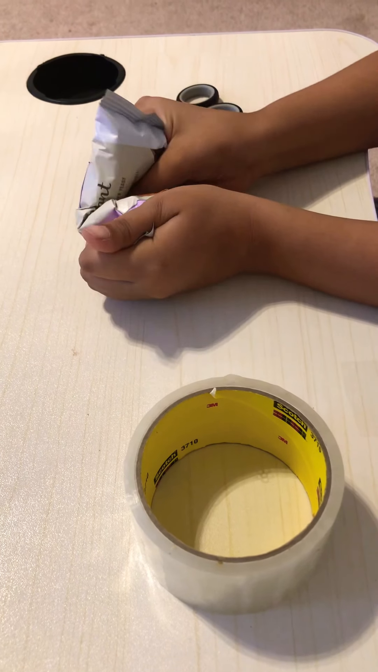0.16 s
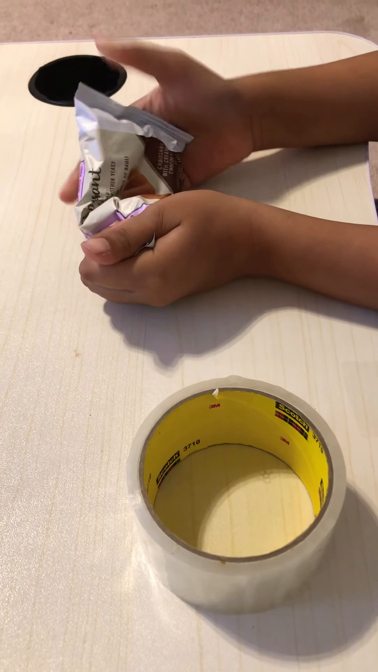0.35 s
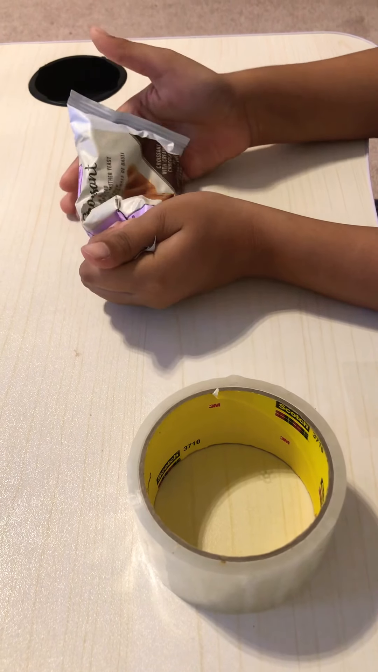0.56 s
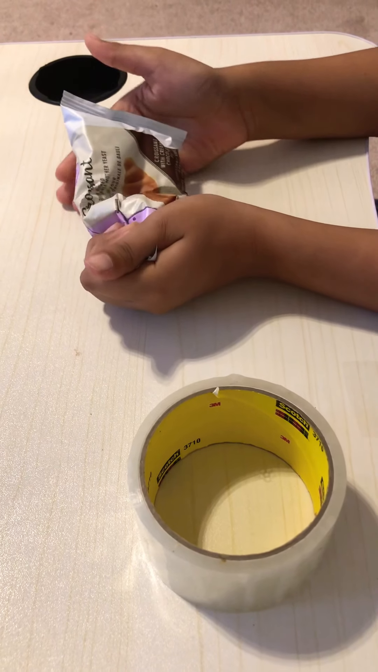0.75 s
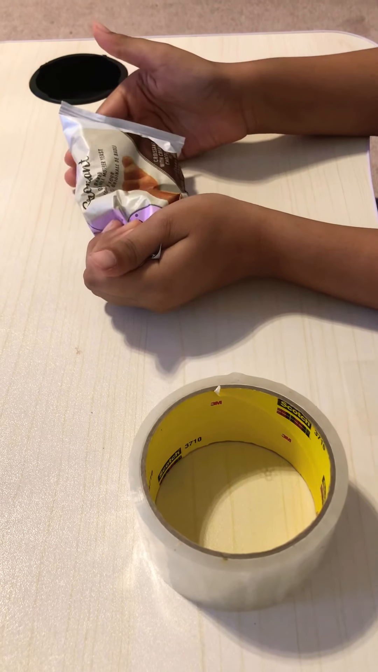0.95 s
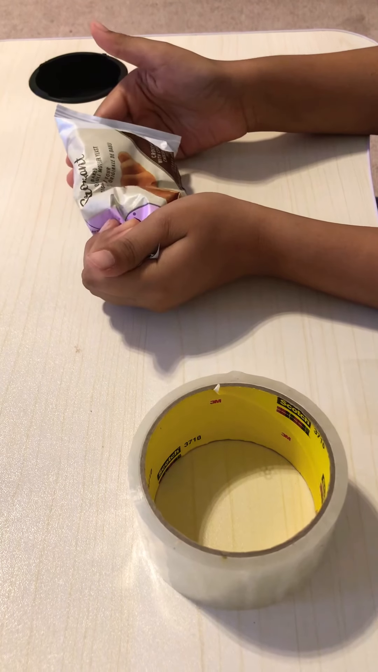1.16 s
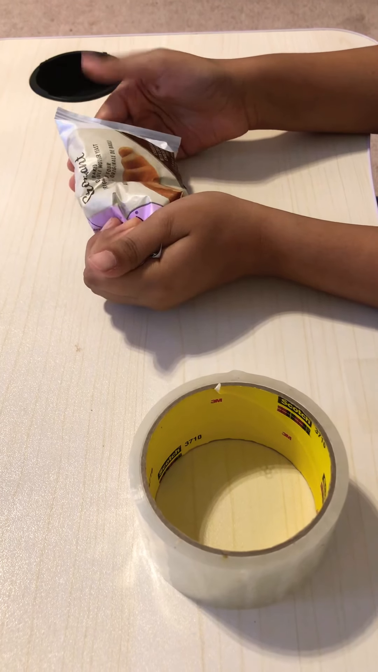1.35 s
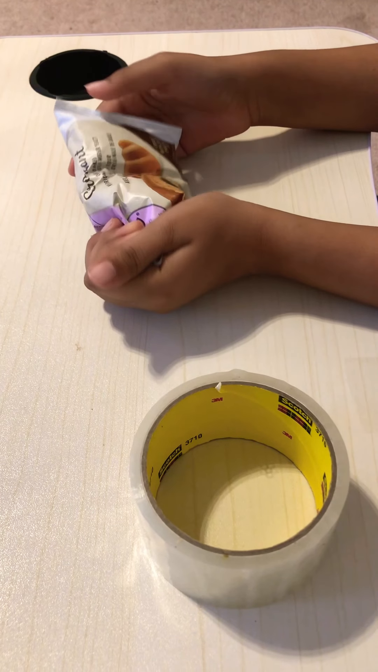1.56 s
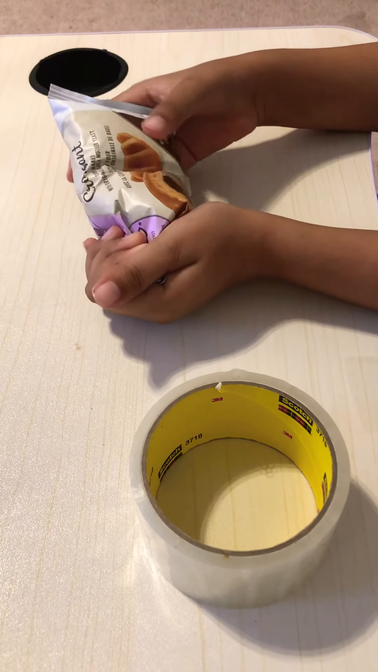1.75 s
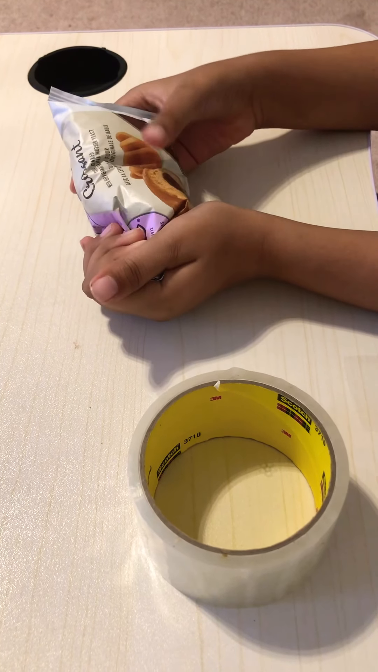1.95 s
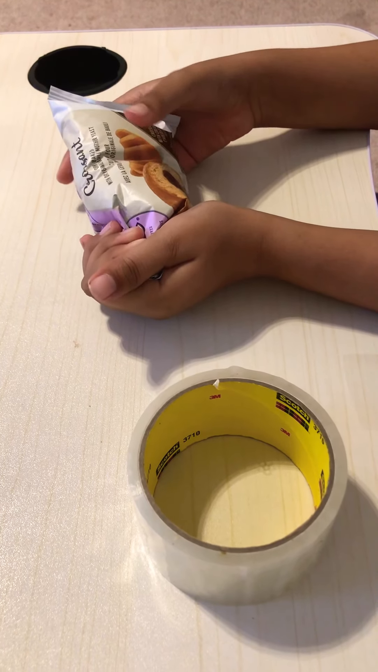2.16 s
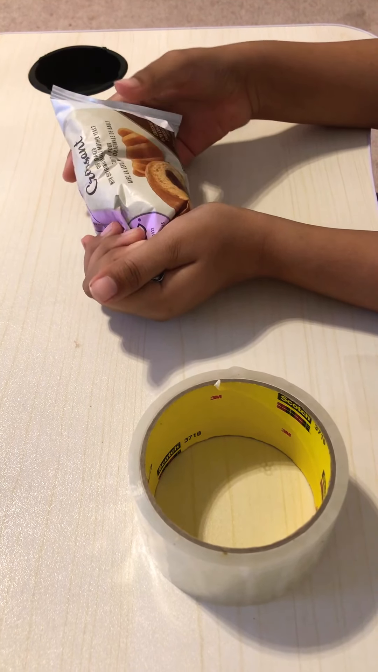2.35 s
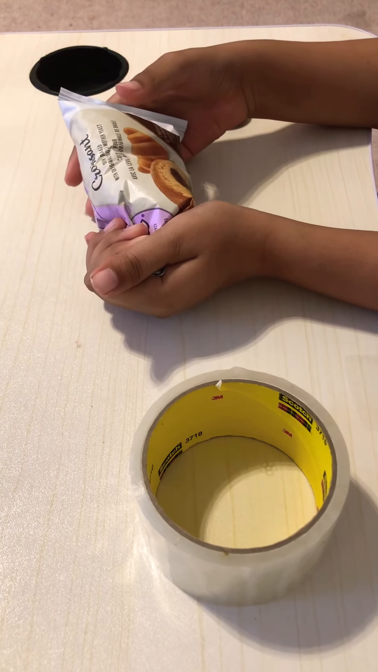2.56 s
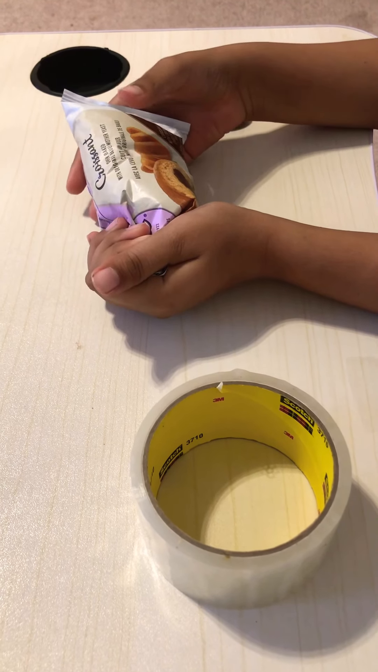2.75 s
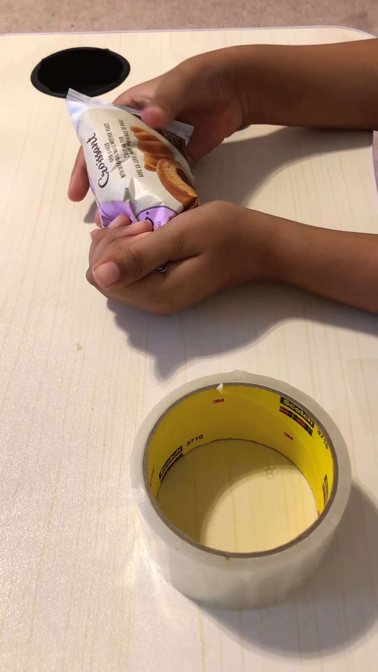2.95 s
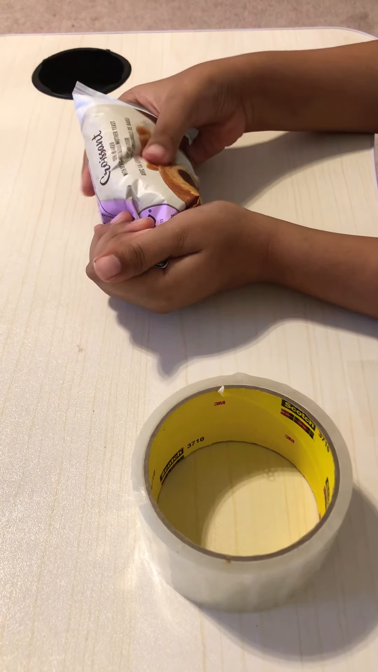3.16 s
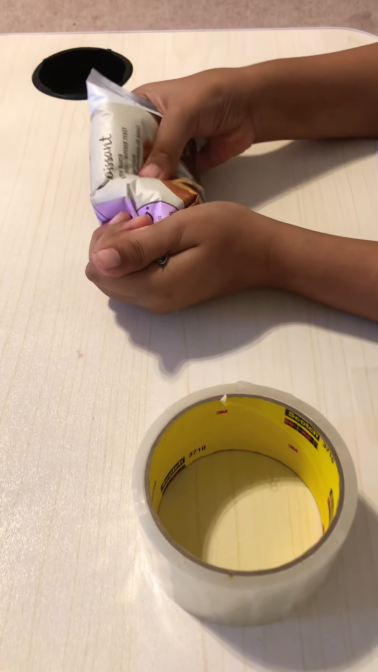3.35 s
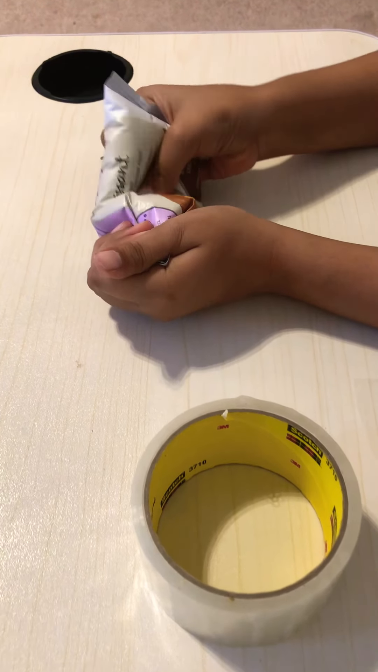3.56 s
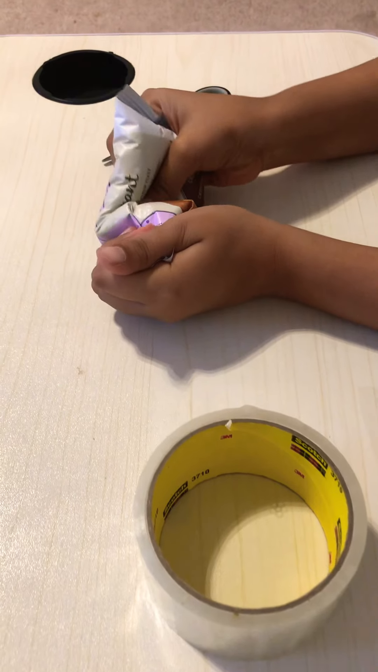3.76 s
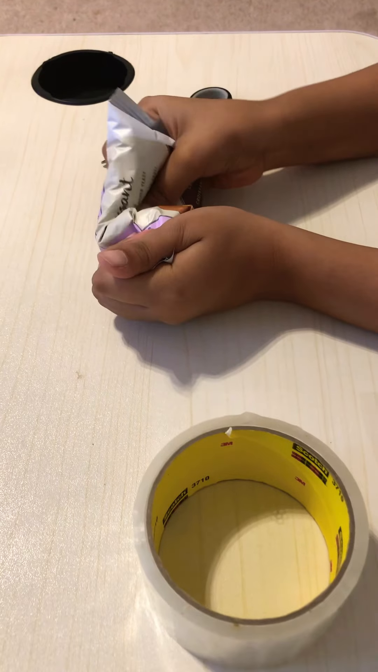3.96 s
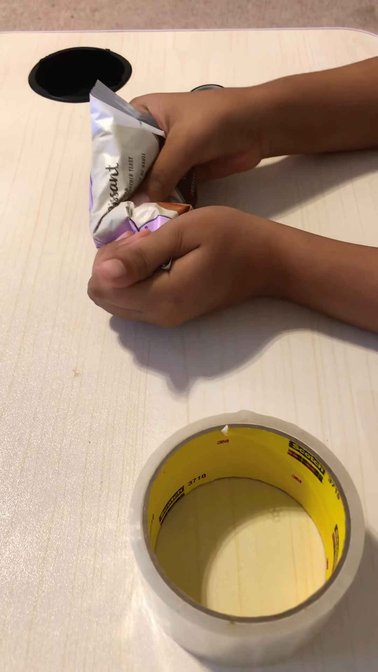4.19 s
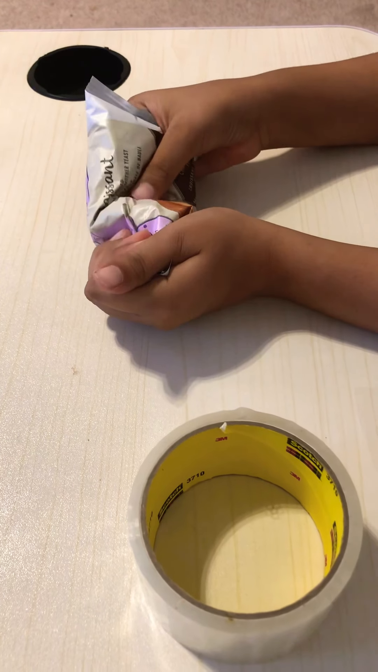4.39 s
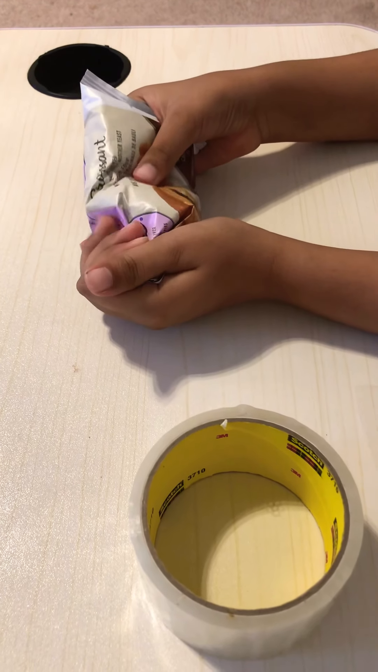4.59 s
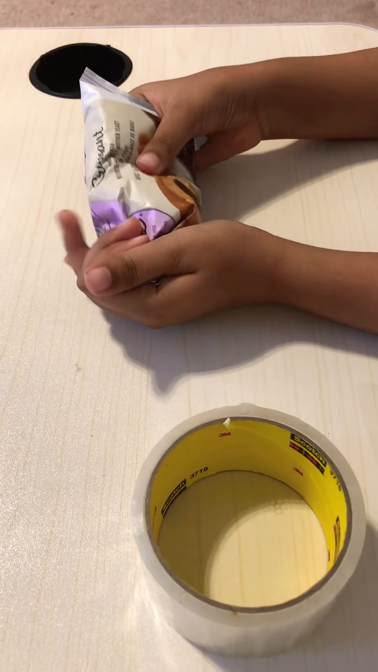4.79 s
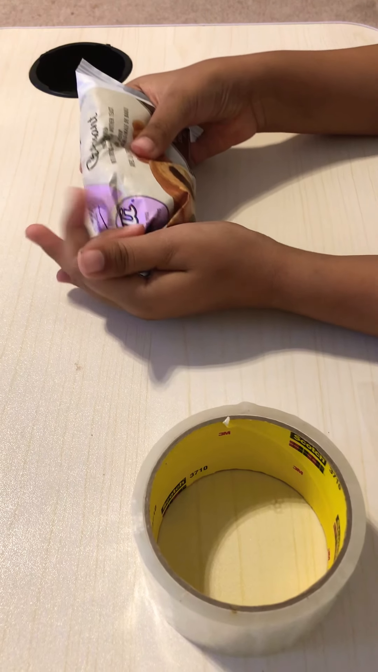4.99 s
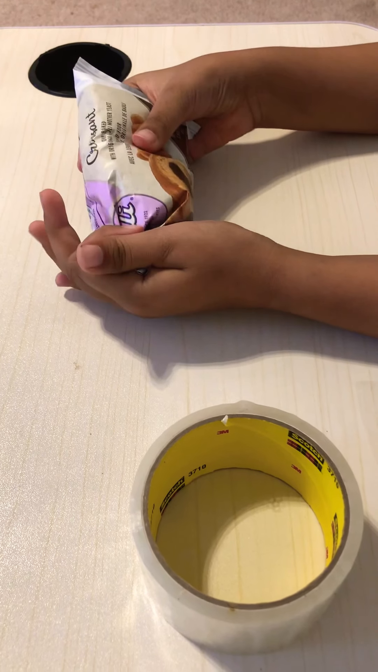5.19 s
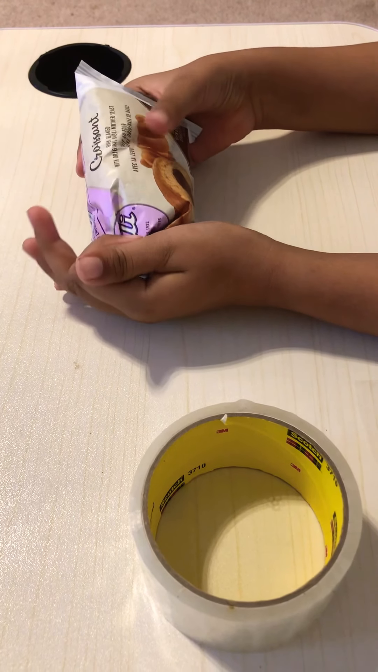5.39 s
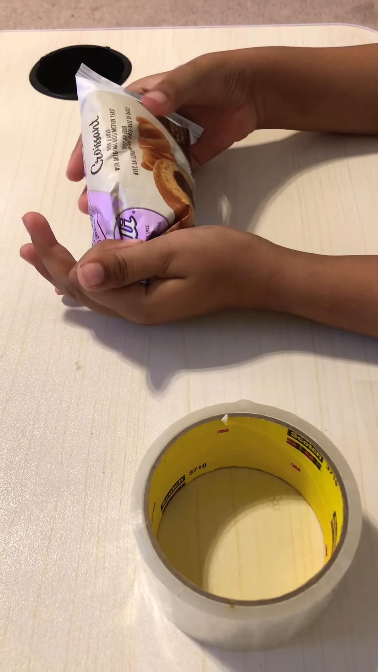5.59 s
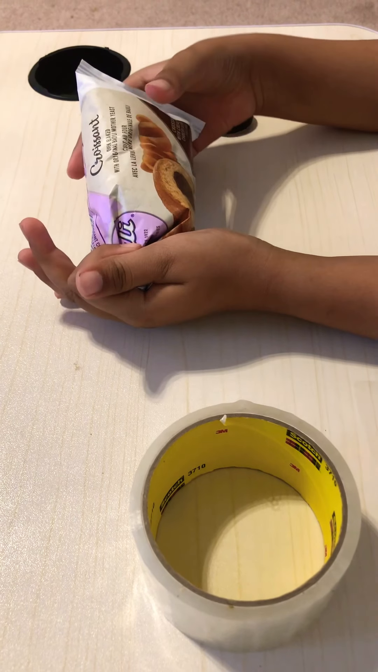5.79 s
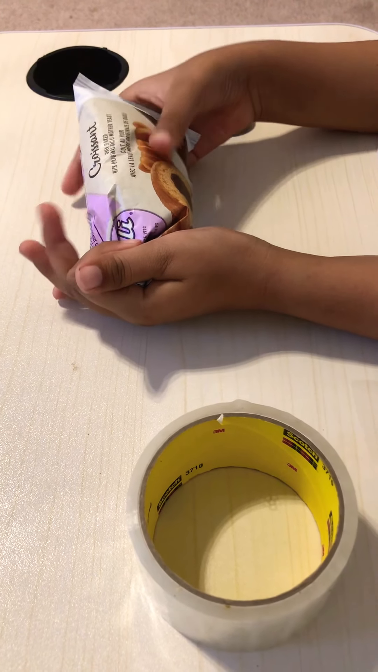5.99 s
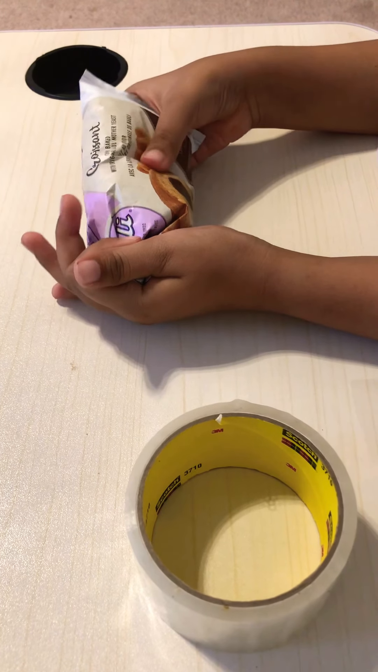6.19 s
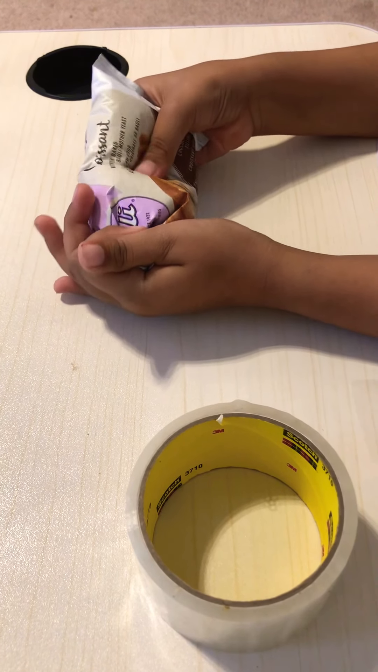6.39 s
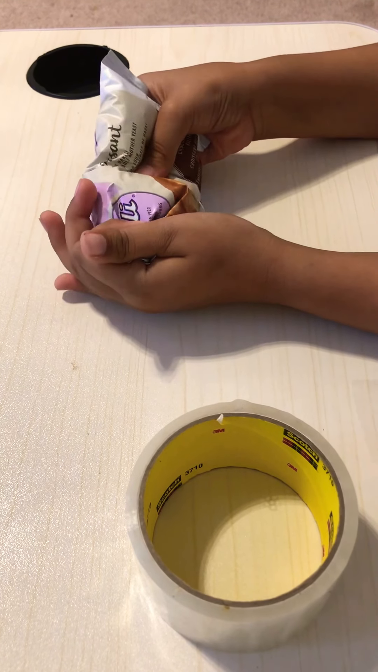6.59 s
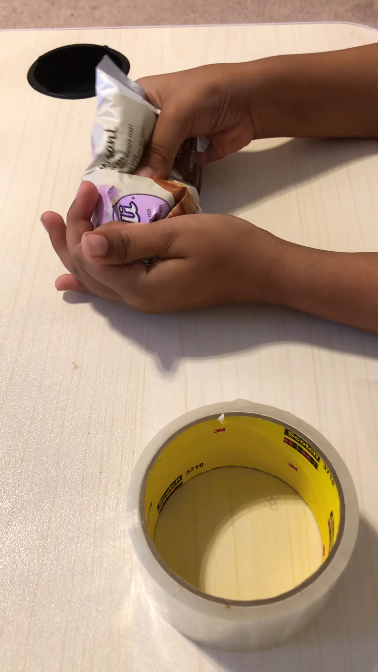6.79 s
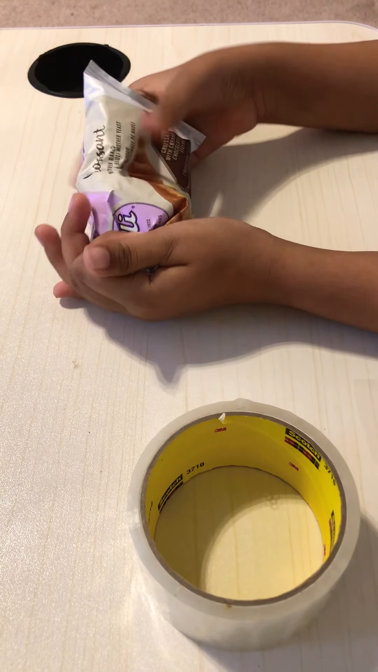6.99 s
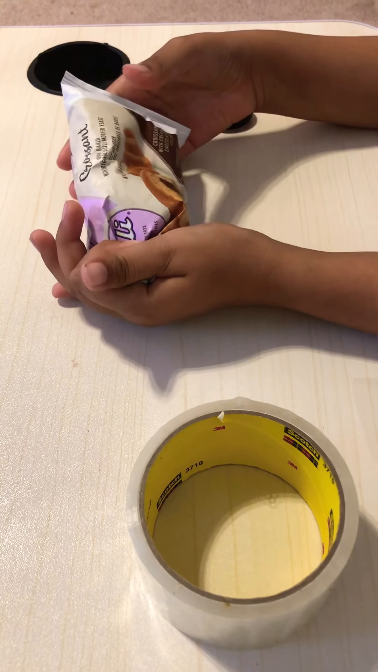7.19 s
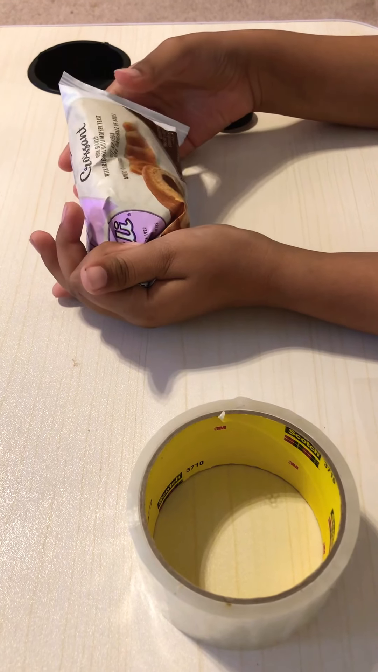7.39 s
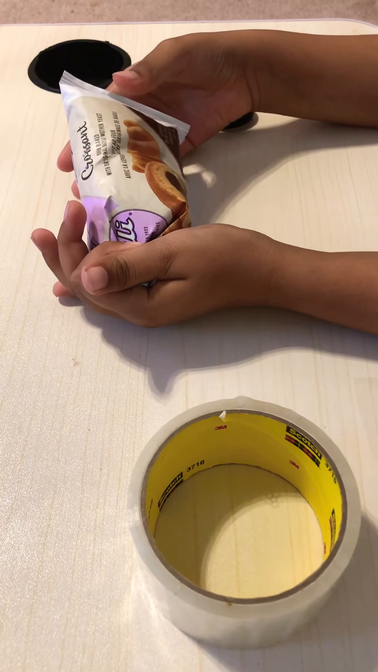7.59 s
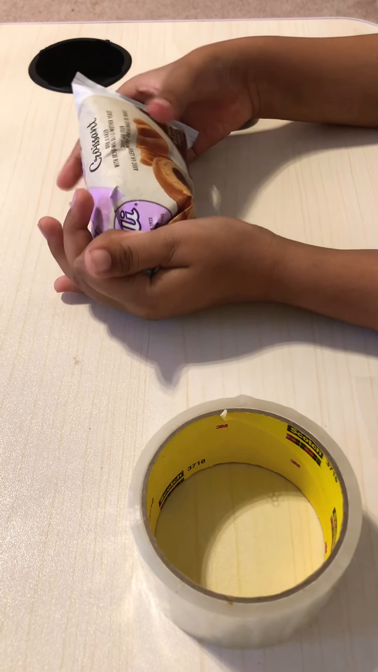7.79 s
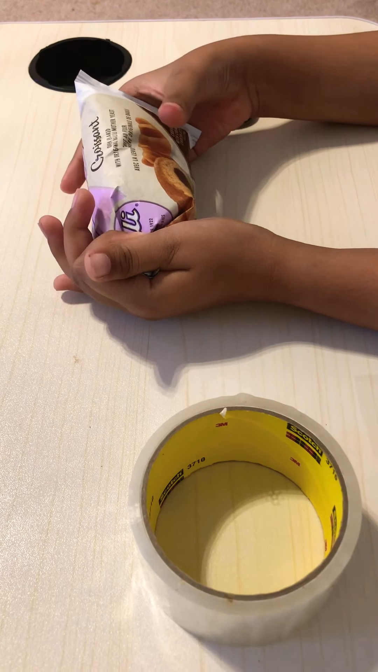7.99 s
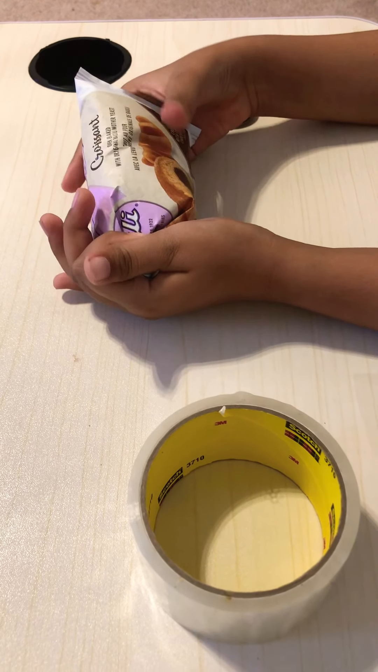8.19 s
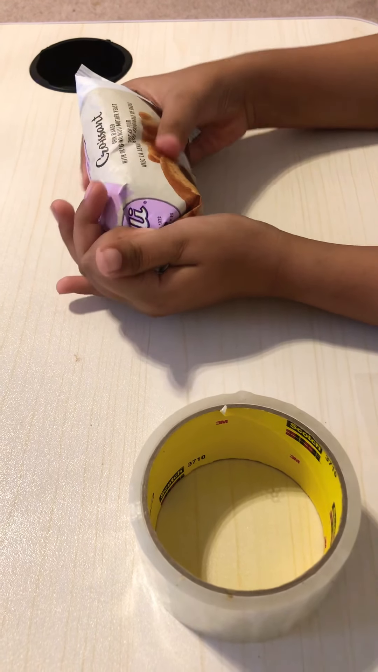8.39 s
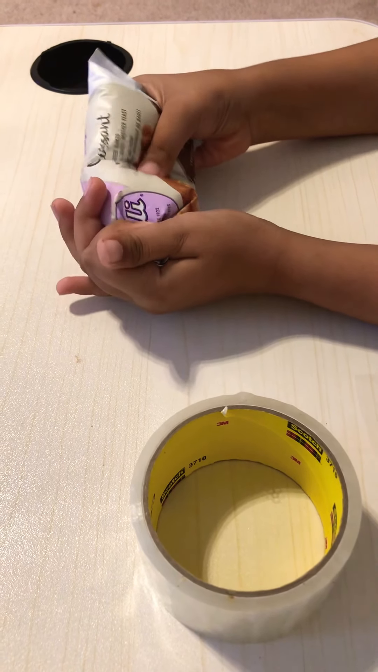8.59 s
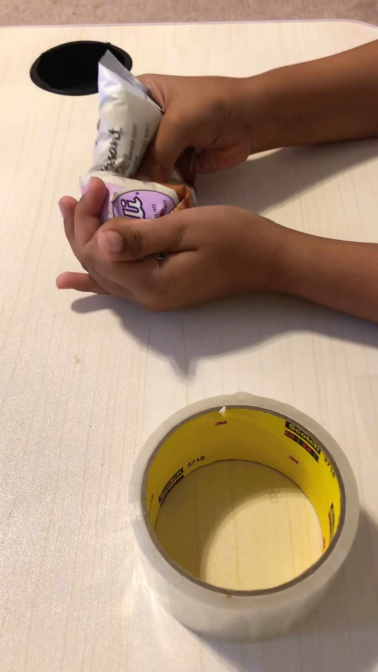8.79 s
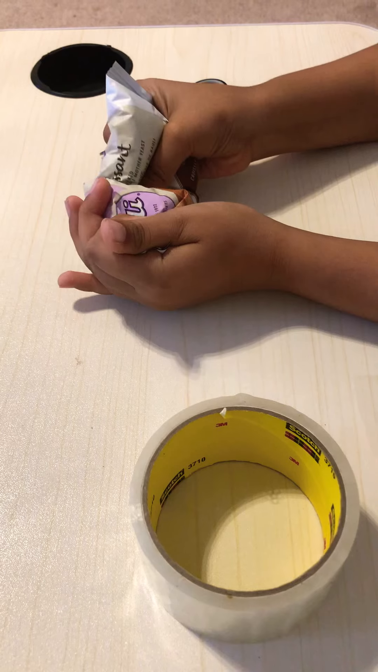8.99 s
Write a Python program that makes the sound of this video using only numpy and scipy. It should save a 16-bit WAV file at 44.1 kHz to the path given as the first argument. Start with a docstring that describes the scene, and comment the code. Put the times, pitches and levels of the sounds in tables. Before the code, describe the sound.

A stuffed plastic snack bag crinkles and snaps in irregular bursts as hands squeeze it on a table, with a brief squeak near the end.

```python
"""Two hands squeeze and release a stuffed plastic snack bag on a table in a small room.
From the start creases in the film snap: a bright crack, then the slower bending wave of the panel.
Countless tiny creases rustle between, over a faint room tone; early on the table rumbles twice, dully.
Squeezes near 3.4, 6.3 and 8.6 s push air out with a hiss, coloured noise that weakens as it flows.
The last one also makes the bag squeak, a wavering tone of three harmonics; the snaps go on to the end."""
import sys
import numpy as np
from scipy import signal
from scipy.fft import rfft, irfft
from scipy.io import wavfile

SR = 44100
rng = np.random.default_rng(int(sys.argv[2]) if len(sys.argv) > 2 else 0)


def waveform_to_disk(signal):
    """Save audio, clipped to [-1, 1], as 16-bit WAV at the path in sys.argv[1]."""
    frames = np.transpose(np.atleast_2d(signal))
    scaled = np.clip(frames, -1, 1) * 32767
    samples = np.round(scaled).astype(np.int16)
    wavfile.write(sys.argv[1], SR, samples)


N = 399105

# Background of the room. Each row: frequency in Hz, relative level in dB.
ROOM_TONE_COLOUR = [(30, -37.5), (41, -8), (80, -3), (125, -9), (175, -0.5), (280, -10), (400, -8.5),
                    (900, -16.5), (1400, -20.5), (8000, -25), (16000, -35)]
ROOM_TONE_DB = -68
# Reverberation. Each row: band centre in Hz, 60 dB decay time in seconds, level in dB.
REVERB_BANDS = [(200, 0.26, -0.5), (500, 0.14, -16), (1270, 0.26, -8.5), (2960, 0.18, -10.5),
                (7000, 0.12, -13.5), (13000, 0.12, -11)]
# Dull rumbles as the arms shift on the table. Each row: start in seconds, length in seconds, level in dB.
RUMBLES = [(0.22, 0.15, -61), (0.6, 0.15, -69)]
# Colour of the rumble. Each row: frequency in Hz, relative level in dB.
RUMBLE_COLOUR = [(20, -5.5), (42, -4), (65, -4.5), (130, -22), (500, -70)]
# Soft bumps of fingers and stuffing. Each row: start in seconds, pitch in Hz, energy in dB.
BUMPS = [(2.0122, 452, -12), (5.188, 233, -29.5), (5.311, 275, -23), (5.554, 230, -32.5), (5.993, 386, -29),
         (7.392, 284, -24)]
# Squeezes hard enough to press air out. Each row: time of full flow in seconds, length in seconds,
# level in dB.
SQUEEZES = [(3.405, 0.34, -34), (6.303, 0.18, -56), (8.59, 0.17, -41.5)]
AIR_RISE_DB_PER_S, AIR_SAG_DB_PER_S, AIR_FALL_DB_PER_S = 155.5, 28, 170
# Colour of the escaping air. Each row: frequency in Hz, relative level in dB.
AIR_COLOUR = [(300, -16), (1300, -21.5), (2200, -8), (3300, 2), (4800, -4.5), (7200, 1), (9600, -4.5),
              (16000, -6)]
# Path of the squeak. Each row: time in seconds, pitch in Hz, level in dB before the harmonics' own levels.
SQUEAK_PATH = [(8.549, 744, -45), (8.571, 747, -41.5), (8.581, 718, -18.5), (8.592, 708, -21),
               (8.602, 747, -20.5), (8.611, 783, -23.5), (8.618, 930, -36), (8.638, 1075, -41)]
# Harmonics of the squeak. Each row: multiple of the pitch, level in dB.
SQUEAK_HARMONICS = [(1, -2.5), (2, -11.5), (3, -20)]
# Strokes of the hands, each pressing the bag or letting it swell. Each row: start in seconds,
# length in seconds, crack level in dB, panel level in dB (both before the trims in the rustle).
STROKES = [(0.0, 0.026, -55.5, -75), (0.23, 0.071, -46, -41), (0.378, 0.049, -51, -52.5),
           (0.568, 0.32, -61, -66), (0.98, 0.092, -62.5, -68), (1.225, 0.095, -65.5, -64),
           (1.445, 0.46, -68, -65.5), (2.428, 0.015, -57, -72), (2.69, 0.029, -65.5, -72),
           (3.023, 0.16, -51, -48.5), (3.224, 0.088, -44.5, -68), (3.486, 0.36, -56, -63),
           (3.956, 0.22, -62.5, -61.5), (4.173, 0.31, -58, -64.5), (4.559, 0.17, -56.5, -53),
           (4.823, 0.14, -54, -56), (5.33, 0.12, -54.5, -55), (5.7, 0.34, -67, -71),
           (6.085, 0.22, -48.5, -49.5), (6.265, 0.32, -48, -53.5), (6.817, 0.06, -49, -49.5),
           (6.92, 0.1, -46, -47), (7.12, 0.047, -61, -60), (7.29, 0.07, -55.5, -53),
           (7.478, 0.026, -55.5, -52), (7.605, 0.3, -69.5, -66.5), (8.225, 0.28, -62, -62.5),
           (8.45, 0.09, -42.5, -42.5), (8.57, 0.13, -42.5, -69), (8.732, 0.12, -48, -64),
           (8.946, 0.069, -61.5, -75)]
STROKE_RISE_DB_PER_S, STROKE_FALL_DB_PER_S = 330, 169.5
HOLD_CRACK_DB, HOLD_PANEL_DB = -77, -70.5  # faint crinkle of the bag merely held, before the same trims
# Larger creases that snap. Each row: start in seconds, crack energy in dB, crack centre in Hz,
# panel energy in dB.
SNAPS = [(0.056, -24, 3000, -33), (0.076, -31, 2700, -30), (0.1055, -15, 4200, -28),
         (0.118, -6.5, 4140, -20), (0.1437, -10.5, 4000, -24), (0.1621, -10.5, 5660, -21),
         (0.19, -14.5, 4070, -17.5), (0.2341, -12.5, 3760, -14), (0.259, -33, 3400, -8.5),
         (0.2661, -14.5, 5170, -7.5), (0.285, -19, 4260, -16.5), (0.2902, -13, 6240, -15),
         (0.305, -21, 3200, -13), (0.3288, -28, 3800, -18), (0.3817, -16.5, 4300, -18),
         (0.3876, -21, 3500, -23), (0.4321, -19.5, 7700, -25), (0.473, -31, 3200, -25.5),
         (0.504, -22, 2540, -42), (0.5374, -20, 6030, -29), (0.5696, -42, 2700, -21.5),
         (0.6323, -15, 4760, -36), (0.649, -13.5, 10200, -21), (0.688, -22, 4480, -19.5),
         (0.719, -31, 6040, -37), (0.7565, -45, 3020, -25.5), (0.8714, -27.5, 5700, -28),
         (0.9934, -22, 4850, -20.5), (1.0203, -30, 3100, -24), (1.048, -14, 3960, -30),
         (1.0762, -25, 3180, -28), (1.0908, -16, 5740, -29), (1.125, -12, 5540, -21.5),
         (1.1682, -18, 5500, -26), (1.2106, -14, 5100, -28.5), (1.273, -27, 3970, -36),
         (1.3535, -32, 5260, -46), (1.4176, -29, 6800, -52), (1.444, -21.5, 3100, -16.5),
         (1.4966, -24, 3400, -19.5), (1.6914, -24, 5570, -24.5), (1.7047, -45, 2840, -27),
         (1.721, -41, 2200, -21), (1.7355, -15.5, 4230, -23), (1.8055, -38, 2600, -24.5),
         (1.8873, -26, 5500, -55), (1.9797, -29.5, 2460, -25), (2.01, -16, 5600, -22.5),
         (2.1384, -41, 3200, -37.5), (2.2508, -26.5, 3350, -19), (2.282, -32, 2530, -23.5),
         (2.334, -31, 2100, -16.5), (2.407, -29.5, 2500, -24), (2.4372, -16.5, 8400, -18.5),
         (2.5667, -46, 2700, -29), (2.6632, -14, 5100, -18.5), (2.7089, -20.5, 2750, -17.5),
         (2.9694, -27, 2190, -27.5), (3.0233, -9.5, 7350, -13), (3.0518, -25, 5400, -12.5),
         (3.066, -20, 3800, -15), (3.0934, -27, 5300, -28), (3.123, -21, 4000, -14),
         (3.1316, -8, 8200, -11), (3.1565, -16.5, 5930, -18), (3.2012, -8.5, 8800, -24),
         (3.2183, -22, 4200, -29), (3.2768, -2.5, 5100, -10), (3.3072, -12, 5000, -37),
         (3.3336, -7.5, 3700, -14), (3.346, -2, 8900, -13), (3.3533, 6.5, 7000, -22),
         (3.4085, -6, 4200, -27), (3.4783, -11.5, 5420, -19.5), (3.5986, -7.5, 9400, -23.5),
         (3.6722, -11, 8300, -23.5), (3.8543, -22, 4100, -23.5), (3.902, -18, 3980, -35),
         (3.958, -23, 2360, -23), (3.9713, -23, 6200, -35), (4.0274, -21, 3450, -24.5),
         (4.0776, -8.5, 4130, -20.5), (4.107, -29, 2880, -21), (4.1234, -19, 5500, -24),
         (4.1567, -20, 4700, -25), (4.173, -19, 3620, -27), (4.1907, -19, 3000, -17),
         (4.1994, -17, 6100, -11.5), (4.2138, -19.5, 6240, -33), (4.291, -24.5, 5500, -29),
         (4.338, -24.5, 3500, -29), (4.3732, -32, 3800, -26.5), (4.4145, -25.5, 4870, -53),
         (4.4948, -20, 6500, -22.5), (4.5415, -23, 6540, -29), (4.6043, -36, 3500, -22.5),
         (4.6425, -23, 4470, -43), (4.6663, -25.5, 5100, -39), (4.6935, -23, 4500, -23),
         (4.768, -29, 3600, -20.5), (4.7896, -32, 3600, -22), (4.8201, -22.5, 6530, -16),
         (4.841, -19.5, 4300, -18), (4.8584, -19, 3500, -14.5), (4.9368, -24, 3300, -32),
         (4.957, -13.5, 2850, -7.5), (4.9823, -15.5, 5370, -19), (5.008, -26, 5430, -21),
         (5.067, -22.5, 3460, -22), (5.2025, -15, 6100, -27.5), (5.2215, -14.5, 2680, -30),
         (5.2784, -23.5, 3100, -15), (5.307, -24, 2300, -22.5), (5.3112, -19.5, 5600, -30),
         (5.355, -28, 3180, -22), (5.392, -22, 3600, -20), (5.4053, -24, 3700, -26),
         (5.4264, -13.5, 14000, -3.5), (5.4724, -24, 3070, -24), (5.482, -24, 3040, -18.5),
         (5.6319, -23.5, 6900, -21), (5.7154, -19.5, 5000, -30), (5.795, -22.5, 4300, -41),
         (5.8451, -19, 3700, -24.5), (5.897, -19, 2670, -28), (5.916, -22, 4400, -30),
         (5.964, -25.5, 4370, -29), (6.06, -16.5, 5760, -20), (6.0805, -19, 3950, -34),
         (6.116, -36, 2250, -15.5), (6.126, -16, 3800, -21), (6.1305, -22, 4000, -14),
         (6.1655, 2, 5040, -2.5), (6.2225, -11.5, 4500, -30), (6.2325, -16, 3700, -11),
         (6.2914, -18, 10100, -34), (6.2965, -8.5, 10100, -32), (6.3516, -13, 7000, -24),
         (6.4293, -17, 6100, -33), (6.464, -8, 5560, -18), (6.481, -8.5, 4170, -16),
         (6.5247, -17, 14200, -45), (6.5387, -10.5, 2860, -24), (6.5679, -10.5, 8800, -18.5),
         (6.6045, -13.5, 6300, -35), (6.6416, -18.5, 4340, -30), (6.7908, -18, 5100, -29),
         (6.7973, -19.5, 3130, -13.5), (6.85, -16, 6000, -14.5), (6.8733, -18.5, 5500, -27),
         (6.9016, -19, 5200, -40), (6.9065, -15, 6500, -11), (6.9327, -10.5, 8950, -17),
         (6.9408, -14, 7000, -8), (6.974, -16, 5330, -38), (6.9876, -17, 4900, -19), (7, -15, 5900, -23),
         (7.0572, -28, 2900, -19), (7.078, -16.5, 4500, -22), (7.1514, -45, 3200, -20.5),
         (7.1597, -21, 2880, -18), (7.1667, -24, 5900, -36), (7.239, -18.5, 2430, -18),
         (7.2859, -6, 5140, -15.5), (7.305, -15.5, 3620, -32), (7.3375, -22.5, 3400, -18),
         (7.3657, -39, 3100, -23), (7.3928, -22, 2680, -35), (7.4638, -25, 5400, -18),
         (7.4783, -14.5, 3800, -16), (7.5338, -28, 4100, -25), (7.5965, -23.5, 4020, -19.5),
         (7.6413, -18.5, 7100, -21), (7.6818, -20, 6030, -29), (7.7325, -18.5, 3400, -22),
         (7.877, -23.5, 4130, -31.5), (8.0299, -23, 3800, -25), (8.18, -17.5, 3420, -23),
         (8.2106, -25, 5040, -36), (8.262, -44, 3000, -29), (8.332, -20.5, 4400, -20),
         (8.4093, -15.5, 5360, -8.5), (8.4273, -24, 2200, -13), (8.4358, -38, 4100, -14.5),
         (8.4497, -9, 6000, -18), (8.4723, -9.5, 6850, -33), (8.5161, -26, 5600, -11.5),
         (8.5402, -2.5, 10400, -14), (8.58, -10.5, 5000, -30), (8.6045, -13, 3300, -34),
         (8.6737, -11, 5100, -42), (8.7299, -11, 5860, -35), (8.761, -12.5, 10400, -45),
         (8.8071, -13.5, 4170, -21), (8.8242, -10.5, 4200, -36), (8.8631, -19, 4940, -28.5),
         (8.9518, -10.5, 4360, -21)]
# Colour of a crack around its centre. Each row: frequency as a multiple of the centre, relative level in dB.
CRACK_COLOUR = [(.15, 0), (.4, -2), (.85, 1.5), (1.25, -2), (2, -10.5), (3.5, -20.5), (6, -38)]
# Ring of a film panel on its stuffing. Each row: frequency in Hz, relative level in dB.
PANEL_COLOUR = [(60, -32.5), (200, -18.5), (400, -5.5), (600, -4.5), (800, 0.5), (1020, 4), (1170, -9),
                (1380, -3), (2200, -41)]

TOP_HZ = 16000
TIME = np.arange(N) / SR
GRAIN_SIZE = 1024  # samples in one short wave
GRAIN_HZ = np.fft.rfftfreq(GRAIN_SIZE, 1 / SR) + 1
GRAIN_TIME = np.arange(GRAIN_SIZE) / SR
LEAD = GRAIN_SIZE // 8 / SR  # seconds of room kept ahead of each short wave


def undb(db):
    """Decibels to gain."""
    return 10 ** (np.asarray(db) / 20)


def colour(points, f):
    """Gain of a (frequency, dB) spectrum, joined on a log axis."""
    knots, db = np.transpose(points)
    return undb(np.interp(np.log(np.maximum(f, knots[0])), np.log(knots), db))


def noise(points):
    """Coloured noise of rms 1."""
    white = rfft(rng.standard_normal(N))
    x = irfft(white * colour(points, np.fft.rfftfreq(N, 1 / SR)), N)
    return x / x.std()


def swells(t, starts, lengths, db, rise_db_per_s, fall_db_per_s, sag_db_per_s=0):
    """Gain of movements that build up to their start, hold or sag for their length, then die away."""
    age = t[:, None] - starts
    rise = rise_db_per_s * np.minimum(age, 0)
    sag = sag_db_per_s * np.clip(age, 0, lengths)
    fall = fall_db_per_s * np.maximum(age - lengths, 0)
    gains = undb(np.maximum(db + rise - sag - fall, -140))
    return np.linalg.norm(gains, axis=1)  # overlapping movements add in power


def grains(spectra, delay):
    """Short waves of unit energy from their spectra and their travel time at each frequency."""
    delays = (delay + LEAD) * np.ones(spectra.shape)
    # phase is the running sum of delay over frequency
    phase = 2 * np.pi * np.cumsum(delays, axis=1) * SR / GRAIN_SIZE
    waves = irfft(spectra * (GRAIN_HZ < TOP_HZ) * np.exp(-1j * phase))
    return waves / np.linalg.norm(waves, axis=1, keepdims=True)


def place(times, waves):
    """Sum of short waves, each at its time."""
    index = np.round((times[:, None] - LEAD + GRAIN_TIME) * SR).astype(int)
    inside = (index >= 0) & (index < N)
    return np.bincount(index[inside], waves[inside], N)


def causal(gain):
    """Spectra with these gains whose waves start at once and then die away (minimum phase)."""
    cepstrum = irfft(np.log(gain))
    cepstrum[:, 1:GRAIN_SIZE // 2] *= 2
    cepstrum[:, GRAIN_SIZE // 2 + 1:] = 0
    return np.exp(rfft(cepstrum))


def room_tone():
    """The quiet room: steady coloured noise."""
    return undb(ROOM_TONE_DB) * noise(ROOM_TONE_COLOUR)


def room(x, first_s=0.0074, build_s=0.001):
    """Walls answer after a few milliseconds with a short diffuse tail."""
    t = TIME[:SR // 2]
    log_hz = np.log(np.fft.rfftfreq(len(t), 1 / SR) + 1)
    centres = np.log([row[0] for row in REVERB_BANDS])
    echoes = rfft(rng.standard_normal(len(t)))
    onset = 1 - np.exp(-np.maximum(t - first_s, 0) / build_s)
    response = 0
    for band, (_, t60, db) in zip(np.eye(len(REVERB_BANDS)), REVERB_BANDS):
        fade = onset * np.exp(-np.log(1000) * t / t60)
        fade = fade / np.linalg.norm(fade)
        band_echoes = irfft(echoes * np.interp(log_hz, centres, band), len(t))
        response = response + undb(db) * fade * band_echoes
    return signal.fftconvolve(x, response)[:N]


def rumble(rise_db_per_s=200, fall_db_per_s=80):
    """The table carries the shifting of the arms as a faint low rumble."""
    return noise(RUMBLE_COLOUR) * swells(TIME, *np.transpose(RUMBLES), rise_db_per_s, fall_db_per_s)


def bumps(sharpness=2.0):
    """The padded body of the bag takes a knock and swings for a cycle or two."""
    s, hz, db = np.transpose(BUMPS)
    ratio = GRAIN_HZ / hz[:, None]
    resonance = 1 / (1 + 1j * sharpness * (ratio - 1 / ratio))
    return place(s, grains(resonance, 0) * undb(db)[:, None])


def air(flutter_db=1.6):
    """Air hisses out of the squeezed bag, fluttering a little and weakening as the bag empties."""
    flutter = noise([(10, 4), (60, -3.0), (300, -22), (2000, -88)])
    flow = swells(TIME, *np.transpose(SQUEEZES), AIR_RISE_DB_PER_S, AIR_FALL_DB_PER_S, AIR_SAG_DB_PER_S)
    return noise(AIR_COLOUR) * flow * undb(flutter_db * flutter)


def squeak(waver=0.0057):
    """Under pressure the film vibrates like a reed for a moment; the pitch dips, then rises as it tightens."""
    s, hz, db = np.transpose(SQUEAK_PATH)
    wobble = noise([(100, -2), (400, -8), (2000, -60)])
    pitch = np.interp(TIME, s, hz) * (1 + waver * wobble)
    phase = 2 * np.pi * np.cumsum(pitch) / SR
    tone = sum(undb(level) * np.sin(round(k) * phase) for k, level in SQUEAK_HARMONICS)
    sounding = (TIME > s[0]) * (TIME < s[-1])
    return np.sqrt(2) * tone * undb(np.interp(TIME, s, db)) * sounding


def cracks(hz, scatter=0.093, scatter_s=0.0019, low_hz=1350, keen_db=22):
    """A crease flips: one short swing, followed by its reflections from a few folds around it."""
    fold_share, ripple_db = .15, 3
    shape = (len(hz), GRAIN_SIZE)
    strength = rng.standard_normal(shape) * (rng.random(shape) < fold_share)
    folds = scatter / np.sqrt(fold_share) * strength * np.exp(-GRAIN_TIME / scatter_s)
    folds[:, 0] = 1  # the swing itself
    # each facet of film has its own broad resonances and gaps, half an octave apart
    half_octaves = 2 * np.log2(TOP_HZ / np.minimum(GRAIN_HZ, TOP_HZ))
    bands = np.maximum(1 - np.abs(half_octaves - np.arange(10)[:, None]), 0)
    facet_db = ripple_db * rng.standard_normal((len(hz), 10)) @ bands
    # the smallest creases are keenest in the top octave
    edge_db = keen_db * (hz[:, None] / TOP_HZ) ** 3 * np.minimum(GRAIN_HZ / TOP_HZ, 1) ** 2
    # so small a source radiates little bass
    radiation = 1 / np.sqrt(1 + (low_hz / GRAIN_HZ) ** 4)
    body = colour(CRACK_COLOUR, GRAIN_HZ / hz[:, None])
    return grains(rfft(folds) * causal(body * undb(facet_db + edge_db) * radiation), 0)


def panels(count, tilt_db=2, travel_s=0.001746, dispersion=0.525, path_spread=0.23):
    """The bending wave after a crack: low notes travel slower, so it chirps down; wide panels sound deeper."""
    width, distance = rng.uniform(-1.21, 1, (count, 2)).T[:, :, None]
    size = np.exp(.13 * width)
    slowness = 1000 / np.maximum(GRAIN_HZ, 160)  # 1 at 1 kHz, where travel_s applies
    depth = undb(tilt_db * width * np.log2(np.maximum(slowness, .5)))
    travel = travel_s * np.exp(path_spread * distance) * slowness ** dispersion
    return grains(colour(PANEL_COLOUR, GRAIN_HZ * size) * depth, travel)


def kneading(db, hold_db):
    """Strength of the crinkling over time: the strokes of the hands above a resting grip."""
    s, length = np.transpose(STROKES)[:2]
    t = TIME[::64]
    strokes = swells(t, s, length, db, STROKE_RISE_DB_PER_S, STROKE_FALL_DB_PER_S)
    return np.interp(TIME, t, strokes + undb(hold_db))


def rustle(centre_hz=3300, spread=0.91, crack_db=-2, panel_db=-3.5, rub_db=-6.5, scatter_db=6):
    """Tiny creases of all sizes flip at random, and the film rubs on skin and stuffing."""
    _, _, crack, panel = np.transpose(STROKES)
    crack, panel = kneading(crack, HOLD_CRACK_DB), kneading(panel, HOLD_PANEL_DB)
    per_s = 200
    count = int(per_s * N / SR)
    times = rng.uniform(0, N / SR, count)
    size, pitch = np.clip(rng.standard_normal((count, 2)), -1.5, 1.5).T
    size = undb(scatter_db * size)
    size *= np.sqrt(SR / per_s / np.mean(size ** 2))  # the stream as a whole has rms near 1
    crack_gain = size * np.interp(times, TIME, crack) * undb(crack_db)
    panel_gain = size * np.interp(times, TIME, panel) * undb(panel_db)
    bright = cracks(centre_hz * np.exp(spread * pitch)) * crack_gain[:, None]
    dull = panels(count) * panel_gain[:, None]
    rub = noise([(200, -15), (900, -4.5), (3200, -9), (16000, -23.5)]) * crack * undb(rub_db)
    return place(times, bright + dull) + rub


def snaps():
    """The large creases, one by one: each a crack with its panel's bending wave."""
    s, crack, hz, panel = np.transpose(SNAPS)
    bright = cracks(hz) * undb(crack)[:, None]
    dull = panels(len(s)) * undb(panel)[:, None]
    return place(s, bright + dull)


def scene(squeak_room_db=-10, ring_hz=764, ring_width_hz=5, ring_db=-5):
    """The bag, its reverberation and the quiet room; the squeak leaves one room resonance ringing."""
    bag = snaps() + bumps() + rustle() + air()
    tone = squeak()
    ring = undb(ring_db) * signal.lfilter(*signal.iirpeak(ring_hz, ring_hz / ring_width_hz, fs=SR), tone)
    walls = room(bag + undb(squeak_room_db) * tone) + ring
    return (bag + tone + walls + rumble() + room_tone())[None]


def record(dry):
    """The microphone dips in the middle, and the recorder cuts the deepest bass and the top. The loudest peaks
    are gently rounded so that they stay below full scale."""
    dip_hz, dip_width_hz, dip_share, low_cut_hz = 1350, 280, .4, 36
    dip = signal.lfilter(*signal.iirpeak(dip_hz, dip_hz / dip_width_hz, fs=SR), dry)
    rounded = np.tanh(dry - dip_share * dip)
    sound = signal.sosfilt(signal.butter(6, low_cut_hz, "high", fs=SR, output="sos"), rounded)
    return signal.sosfilt(signal.ellip(10, .1, 70, TOP_HZ, fs=SR, output="sos"), sound)


dry = scene()
out = record(dry)
waveform_to_disk(out)
```